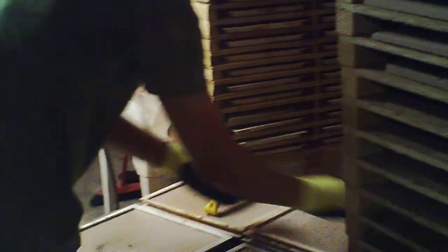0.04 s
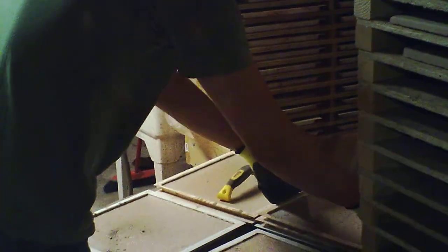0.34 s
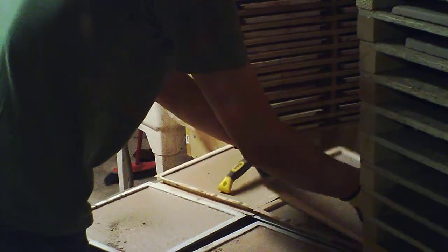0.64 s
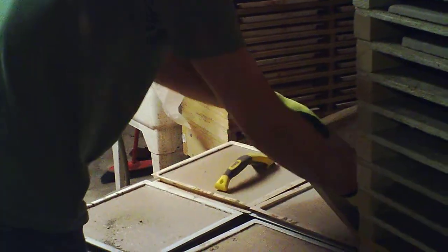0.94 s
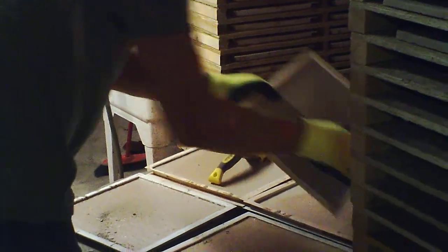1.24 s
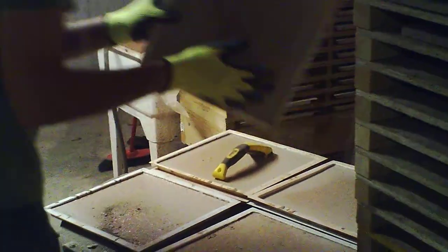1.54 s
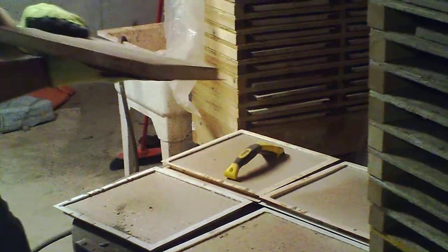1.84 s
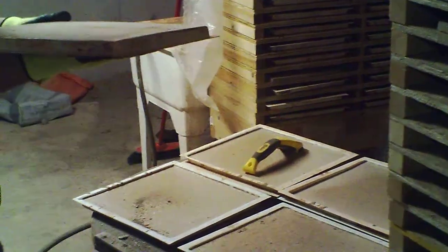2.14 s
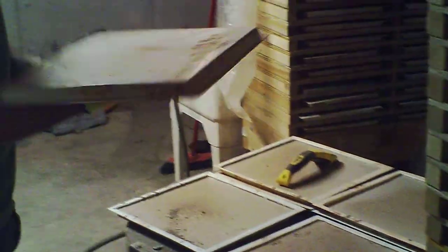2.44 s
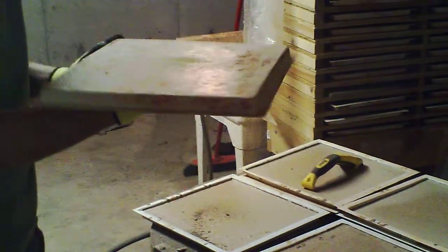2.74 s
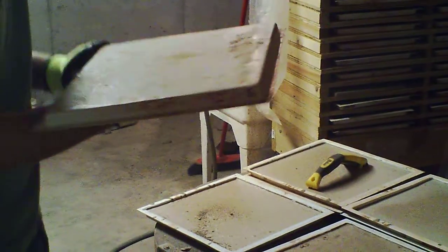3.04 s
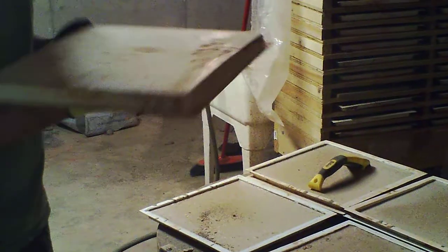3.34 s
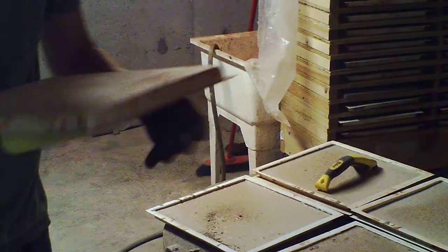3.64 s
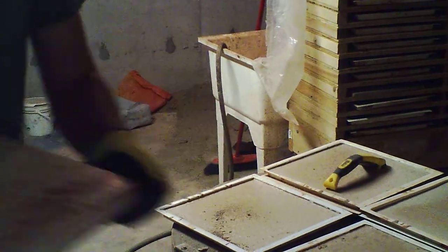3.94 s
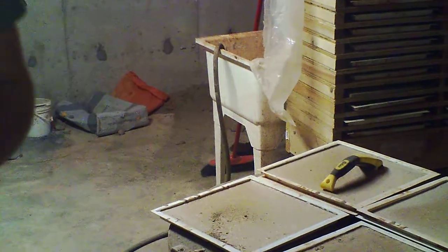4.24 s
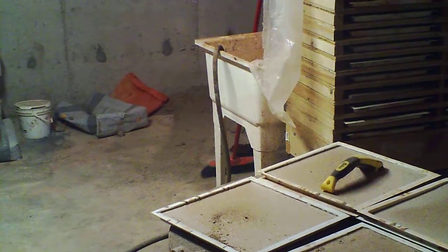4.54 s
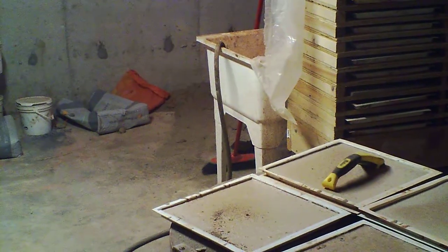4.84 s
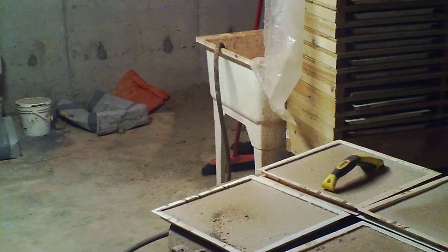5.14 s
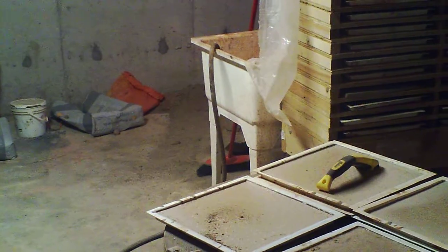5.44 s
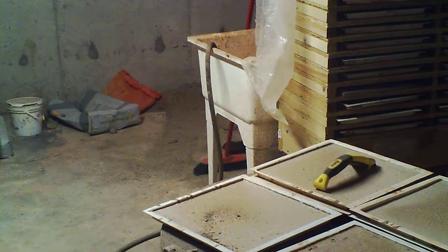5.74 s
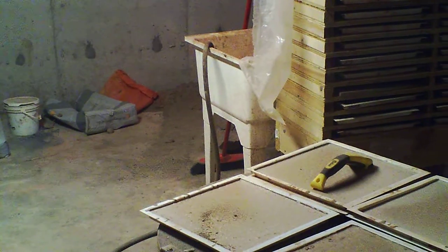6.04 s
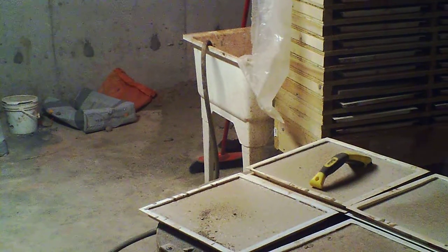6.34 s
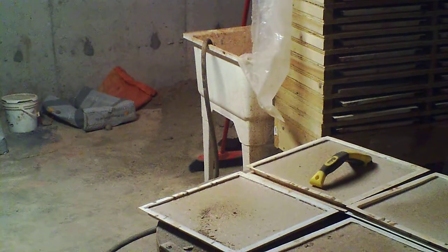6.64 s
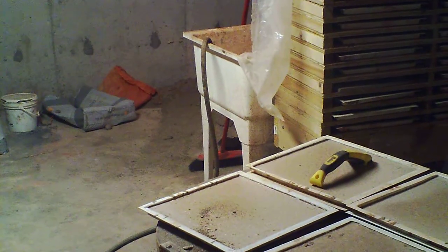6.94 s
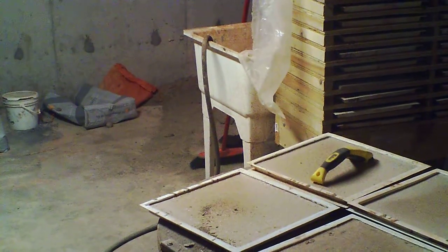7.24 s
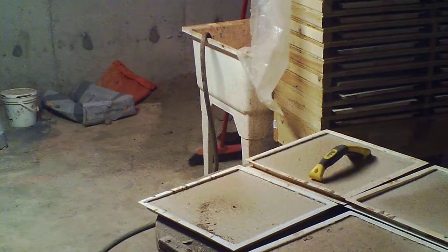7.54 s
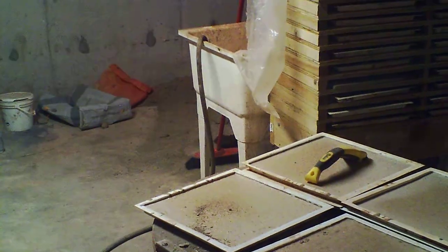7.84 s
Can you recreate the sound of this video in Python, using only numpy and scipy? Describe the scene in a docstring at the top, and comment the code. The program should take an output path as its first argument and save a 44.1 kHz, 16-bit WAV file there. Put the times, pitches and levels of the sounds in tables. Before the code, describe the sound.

In a concrete workshop with a short echo, a stone tile is handled near a single microphone. It rubs against molds and gloves in quiet, uneven strokes, with a dull bump and crisp snaps of grit. Near the end it lands loudly on a rack in two ringing double knocks, slides with a short scrape, and a wooden board clatters. Faint camera ticking and still air lie underneath.

```python
"""A cast stone tile, lifted from its mold by a gloved worker, turned over and set down hard on a rack.
It rings when struck, rubs on molds and gloves and is shoved along; a wooden shelf board clunks.
One microphone in a concrete workshop: grit snaps close by, and the walls add a short echo.
Underneath lie the still air of the room and the faint ticking and whine of the camera."""
import sys
import numpy as np
from scipy import signal
from scipy.fft import next_fast_len
from scipy.io import wavfile
from scipy.ndimage import uniform_filter1d, minimum_filter1d

SR = 44100
rng = np.random.default_rng(int(sys.argv[2]) if len(sys.argv) > 2 else 0)


def persist_wave(psi):
    """Save psi, clipped to +-1, as 16-bit WAV."""
    counts = np.round(np.clip(psi, -1, 1) * 32767).astype(np.int16)
    wavfile.write(sys.argv[1], SR, np.atleast_2d(counts).T)


N = 351918
TIME = np.arange(N) / SR

# spectrum of breaking grit: (frequency [Hz], relative level [dB])
GRIT_SPECTRUM = [(100, -28), (600, -4), (1600, -1.5), (3300, -1), (5000, 0), (8500, 2.5), (11200, -1),
                 (12600, -16), (16000, -14)]


def amp(db):
    """Decibels to gain."""
    return 10 ** (np.asarray(db) / 20)


def unit(x):
    """Scales to rms 1."""
    return x / np.sqrt(np.mean(x ** 2) + 1e-20)


def read(points, hz):
    """Reads a table on a log-frequency axis."""
    freqs, values = np.transpose(points)
    return np.interp(np.log(hz + 1), np.log(freqs + 1), values)


def level(curve):
    """Gain over time from rows (time [s], level [dB]); silent outside them."""
    times, db = np.transpose(curve)
    return amp(np.interp(TIME, times, db, left=-np.inf, right=-np.inf))


def add(mix, start_s, sound):
    """Lays a sound into the mix."""
    part = mix[max(round(start_s * SR), 0):][:len(sound)]
    part += sound[:len(part)]


def play(source, rows, **settings):
    """Sounds one event for each row (time [s], arguments of the source)."""
    mix = np.zeros(N)
    for start_s, *row in rows:
        add(mix, start_s, source(*row, **settings))
    return mix


def shape(x, db_at):
    """Filters by a gain in dB given as a function of frequency; causal, so attacks stay sharp."""
    size = next_fast_len(len(x) + 4096)
    log_gain = np.log(amp(db_at(abs(np.fft.fftfreq(size, 1 / SR)))))
    response = np.exp(np.conj(signal.hilbert(log_gain)))
    return np.fft.ifft(np.fft.fft(x, size) * response).real[:len(x)]


def colour(x, spectrum):
    """Filters a sound by a spectrum table and scales it to rms 1."""
    return unit(shape(x, lambda hz: read(spectrum, hz)))


def hump(hz, centre_hz, octaves):
    """A bell on the log-frequency axis."""
    return np.exp(-.5 * (np.log2((hz + 1) / centre_hz) / octaves) ** 2)


def fade(t, t60):
    """Exponential decay, 60 dB in t60 seconds."""
    return np.exp(-np.log(1000) * t / t60)


def die_away(x, t60s):
    """Lets each band decay at its own speed."""
    hz, t, bands = signal.stft(x, SR, nperseg=256)
    return signal.istft(bands * fade(t, read(t60s, hz)[:, None]), SR)[1][:len(x)]


def still_air():
    """Room tone: a low, even rush in the workshop."""
    # spectrum of the air: (frequency [Hz], relative level [dB])
    spectrum = [(12, -9), (30, -1.5), (70, -5), (130, -9.5), (320, -12.5), (550, -21.5), (1300, -24.5),
                (2400, -31), (4000, -31.5), (6400, -35.5), (8000, -32.5), (11500, -38), (16000, -41)]
    return amp(-53.5) * colour(rng.standard_normal(N), spectrum)


def camera_ticks(ticks_per_s=30.04, first_s=.021, tick_s=.013, jitter_s=.0013, spread_db=.6):
    """Right at the microphone, soft, slightly uneven ticks ring in the camera's case."""
    # resonances of the case: (frequency [Hz], width [Hz], gain [dB])
    case_modes = [(352, 34, 11.5), (670, 130, 6), (1090, 53, 7), (1660, 400, -1), (3080, 650, -12.5),
                  (4050, 550, -25), (5270, 230, -13.5), (6530, 330, -14), (7500, 460, -20.5)]
    # strength of the ticking: (time [s], level [dB])
    strength = [(0, -57.5), (1.3, -59.5), (2.4, -59.5), (3.6, -57.5), (4.7, -61), (6.2, -63.5), (8, -62)]
    tick = signal.windows.tukey(round(tick_s * SR), .5)
    gate = np.zeros(N)
    for k, (late, size) in enumerate(rng.standard_normal((int(N * ticks_per_s / SR), 2))):
        add(gate, first_s + k / ticks_per_s + jitter_s * late, amp(spread_db * size) * tick)
    bursts = gate * rng.choice([-1., 1.], N)
    ring = sum(amp(db) * signal.lfilter(*signal.iirpeak(hz, hz / width, SR), bursts)
               for hz, width, db in case_modes)
    return unit(ring + amp(-14) * bursts) * level(strength)


def hum_and_whine():
    """A steady low hum and the camera's thin whine."""
    # steady tones: (frequency [Hz], rms level [dB])
    tones = [(30, -61.5), (60, -62), (180, -69), (12195, -95), (12941, -73), (13730, -83)]
    return sum(amp(db) * np.sqrt(2) * np.sin(2 * np.pi * (hz * TIME + rng.random())) for hz, db in tones)


def room(x, build_s=0.004, echoes_per_s=4000):
    """Sparse echoes from concrete walls build up quickly and die within about half a second."""
    # decay of the workshop: (frequency [Hz], t60 [s])
    decay = [(150, 0.36), (700, 0.53), (2000, 0.41), (5000, 0.4), (10000, 0.25), (16000, 0.52)]
    t = np.arange(SR * 3 // 4) / SR
    echoes = rng.choice([-1., 1.], len(t)) * (rng.random(len(t)) < echoes_per_s / SR)
    tail = die_away(echoes, decay) * (1 - np.exp(-t / build_s))
    return signal.fftconvolve(x, tail / np.linalg.norm(tail))[:N]


def scuff(db, ring_hz, length_s, slips_per_s=3000):
    """A quick run of small slips excites one resonance, rising fast and easing off."""
    progress = np.linspace(0, 1, round(length_s * SR))
    slips = rng.standard_normal(len(progress)) * (rng.random(len(progress)) < slips_per_s / SR)
    slips *= np.sin(np.pi * np.sqrt(progress))
    chatter = shape(slips, lambda hz: read(GRIT_SPECTRUM, hz) + 20 * hump(hz, ring_hz, octaves=0.39))
    return amp(db) * unit(chatter)


def snap(db, ring_hz, lift_db, t60):
    """A grain breaks or an edge slips: a brief burst through one resonance, and a faint short tail."""
    t = np.arange(SR // 8) / SR
    burst = rng.choice([-1., 1.], len(t)) * (fade(t, t60) + amp(-21) * fade(t, t60=0.14))
    ring = shape(burst, lambda hz: read(GRIT_SPECTRUM, hz) + lift_db * hump(hz, ring_hz, octaves=0.25))
    return amp(db) * np.std(burst) * unit(ring)


def bump(db, hz):
    """A padded blow wakes only a low mode, over a dull thud."""
    # spectrum of the thud: (frequency [Hz], relative level [dB])
    spectrum = [(60, -6), (170, -8), (480, -0.5), (800, -4.5), (1500, -14.5), (3000, -25), (12000, -66)]
    t = np.arange(SR // 2) / SR
    thud = colour(rng.standard_normal(len(t)), spectrum) * fade(t, t60=0.17)
    ring = np.sin(2 * np.pi * hz * t) * fade(t, t60=0.14)
    return amp(db) * (ring + amp(-7) * thud)


def stroke_pressures(depth_db=22.5):
    """Pressure on stone and on gloves: each stroke builds by depth_db to its peak, then lets go."""
    # strokes of the tile: (peak time [s], swell [s], release [s], stone rub [dB], glove brush [dB])
    strokes = [(.04, 0.2, 0.18, -55.5, -88), (.285, 0.064, 0.046, -60, -48.5), (.385, 0.23, 0.1, -50, -51),
               (.495, 0.1, 0.079, -37, -37.5), (0.559, 0.029, 0.12, -39.5, -42.5),
               (.775, 0.13, 0.086, -65, -48.5), (.91, 0.29, 0.29, -49.5, -55.5),
               (1.117, 0.099, 0.083, -41.5, -48.5), (1.6, .05, 0.089, -60, -48),
               (1.73, 0.27, 0.29, -68, -52), (1.9, .04, 0.11, -71, -49.5), (2.24, 0.14, .09, -46.5, -50.5),
               (2.53, .06, 0.08, -51, -51), (2.72, 0.1, 0.16, -51.5, -47.5), (2.84, 0.038, 0.082, -47, -48),
               (3.15, 0.27, 0.2, -54, -57.5), (3.33, 0.07, 0.16, -68, -47.5),
               (3.4, 0.073, 0.081, -48.5, -67), (3.78, 0.045, 0.045, -51, -50),
               (4.02, 0.57, 0.61, -55.5, -50.5), (4.3, .1, 0.24, -50, -52), (4.566, 0.099, 0.072, -35, -43),
               (4.915, .03, 0.21, -45, -53), (5.02, 0.044, 0.88, -55, -52.5), (5.3, 0.23, 0.15, -46, -52),
               (5.55, 0.2, 0.27, -52, -57.5), (5.925, 0.16, 0.085, -41, -53.5),
               (6.03, 0.086, 0.1, -51.5, -52), (6.19, 0.12, 0.066, -52, -62),
               (6.329, 0.071, 0.081, -40.5, -51.5), (6.4, 0.06, 0.047, -42, -63),
               (6.61, 0.34, 0.077, -49, -58)]
    power = np.zeros((2, N))
    for peak_s, swell_s, release_s, stone_db, glove_db in strokes:
        away = np.maximum((peak_s - TIME) / swell_s, (TIME - peak_s) / release_s)
        near = away < 3
        power[0, near] += amp(stone_db - depth_db * away[near]) ** 2
        power[1, near] += amp(glove_db - depth_db * away[near]) ** 2
    return np.sqrt(power)


def friction(pressure, spectrum, grains_per_s, spread_db=0, judder_db=0):
    """Sand grains catch and let go as tiny clicks, spread in size and bunched by the stroke's judder."""
    sizes = amp(spread_db * np.minimum(rng.exponential(1, N), 4))
    clicks = sizes * rng.choice([-1, 1], N) * (rng.random(N) < grains_per_s / SR)
    judder = unit(uniform_filter1d(uniform_filter1d(rng.standard_normal(N), size=500), size=300))
    return colour(clicks * amp(judder_db * judder), spectrum) * pressure


def tile_sliding(on_stone, on_gloves):
    """The tile rubs over the molds, brushes through the gloves and is shoved along its shelf."""
    # spectra of the three contacts: (frequency [Hz], relative level [dB])
    stone_spectrum = [(100, -19.5), (300, -10), (480, -5.5), (700, -2), (850, -1.5), (1100, 0),
                      (1750, -3.5), (2400, -15), (3400, -8), (5000, -15), (10000, -38), (16000, -50.5)]
    glove_spectrum = [(300, -22.5), (1500, 0.5), (3200, -0.5), (4600, -5.5), (6000, -3.5), (7700, -3),
                      (9500, -1.5), (11300, -7), (12600, -11.5), (16000, -24.5)]
    shelf_spectrum = [(200, -42), (480, -28), (720, -2), (900, -22), (1080, -2.5), (1500, -5.5), (2500, -4),
                      (3600, 4), (4300, -3.5), (5400, -1), (9400, -6.5), (12000, -17.5), (16000, -22)]
    # push along the shelf: (time [s], level [dB])
    push = [(6.98, -57), (7.03, -51.5), (7.085, -49), (7.115, -35), (7.17, -29.5), (7.2, -31.5),
            (7.225, -42.5), (7.28, -65), (7.4, -84)]
    rub = friction(on_stone, stone_spectrum, grains_per_s=3500, judder_db=3.5)
    brush = friction(on_gloves, glove_spectrum, grains_per_s=3900, spread_db=1.5, judder_db=2.5)
    shove = friction(level(push), shelf_spectrum, grains_per_s=2400, spread_db=1.8, judder_db=1.8)
    return amp(-1.6) * rub + amp(-1.8) * brush + shove


def knock(db, treble_db, place_hz, lift_db, crack_db, modes, modes_db, body_db, lowest_hz):
    """A hard contact cracks, then the struck thing rings; the place of the blow favours some modes."""
    # spectra of the crack and the dense ringing between modes: (frequency [Hz], relative level [dB])
    crack_spectrum = [(100, -7), (270, -1.5), (550, -6), (1100, -1), (1850, 8.5), (2350, -12.5),
                      (3200, 9.5), (4500, 0), (6500, -0.5), (10000, -3), (12500, -22.5), (16000, -36)]
    body_spectrum = [(40, -31), (130, -10), (250, -12.5), (420, -4.5), (700, 0.5), (1200, 1), (1850, 2),
                     (2350, -1.5), (3300, -2.5), (4500, -7), (8000, -13), (10500, -17), (13000, -18),
                     (16000, -23.5)]
    # decay of that dense ringing: (frequency [Hz], t60 [s])
    body_decay = [(150, 0.82), (600, 0.26), (1500, 0.28), (3500, 0.22), (8000, 0.26), (15000, 0.08)]
    t = np.arange(SR // 2) / SR
    partials = sum((-1) ** k * amp(mode_db) * fade(t, t60) * np.sin(2 * np.pi * hz * t)
                   for k, (hz, mode_db, t60) in enumerate(modes))
    partials /= np.sqrt(sum(amp(mode_db) ** 2 for _, mode_db, _ in modes) / 2)
    body = die_away(colour(rng.standard_normal(len(t)), body_spectrum), body_decay)
    ring = amp(modes_db) * partials + amp(body_db) * body
    ring = shape(ring, lambda hz: treble_db * hz ** 2 / (hz ** 2 + 2800 ** 2)
                 + lift_db * (hump(hz, place_hz, octaves=0.26) - .5))
    crack = colour(rng.choice([-1., 1.], len(t)), crack_spectrum) * fade(t, t60=0.04)
    # a small slab radiates almost no deep bass
    low_cut = signal.butter(2, lowest_hz, "high", fs=SR, output="sos")
    return amp(db) * signal.sosfilt(low_cut, ring + amp(crack_db) * crack)


def board_clunks(gap_s=0.018, shrink=.95, loss_db=3.5, dull_db=3):
    """A wooden shelf board catches and drops, bouncing at shrinking gaps, weaker and duller each time."""
    # blows on the board:
    # (time [s], relative level [dB], treble [dB], favoured pitch [Hz], its lift [dB], crack [dB])
    blows = [(7.587, -31, -7, 900, 1.5, 3), (7.705, -27, -10.5, 198, 7, -4),
             (7.7545, -28.5, -5, 1000, 1.7, -14), (7.765, -18.5, -7, 1160, 5.5, -1)]
    # modes of the board: (frequency [Hz], relative level [dB], t60 [s])
    modes = [(178, -15.5, 0.23), (351, -4, 0.25), (463, -6.5, 0.48), (541, -1.5, 0.65), (800, -8, .22),
             (910, -10, 0.067), (960, -8, 0.15), (995, -2, 0.16), (1090, 5.5, 0.057), (1206, -20, 0.2),
             (1350, -6, 0.12), (1440, -22, 0.15), (1750, -1.5, 0.051), (2030, -11, 0.17), (3110, 2, 0.11)]
    delays = np.cumsum(gap_s * shrink ** np.arange(5)) - gap_s
    bounces = [(start_s + delay, db - k * loss_db, treble - k * dull_db, hz, lift, crack - k * dull_db)
               for start_s, db, treble, hz, lift, crack in blows for k, delay in enumerate(delays)]
    return amp(1.1) * play(knock, bounces, modes=modes, modes_db=-4.5, body_db=0.5, lowest_hz=80)


def tile_knocks():
    """The stone rings as it strikes molds and rack, lightly at first, then set down hard."""
    # blows on the tile:
    # (time [s], relative level [dB], treble [dB], favoured pitch [Hz], its lift [dB], crack [dB])
    blows = [(.4585, -43, 1, 1260, 11, 0), (.539, -36.5, 13, 660, 5.5, -16), (1.056, -48.5, 5, 1300, 1, -4),
             (2.23, -50.5, -4, 1700, 11, -11), (3.301, -46, -21, 1500, 21, -14),
             (4.841, -42.5, -4, 1060, 10, -11), (4.896, -41.5, -6, 980, 1.5, -17),
             (5.538, -51, -4, 990, 6, 7.5), (5.846, -43.5, 6, 910, 17, -.5),
             (6.539, -36.5, -25, 1100, 5, -5), (6.6342, -15, -13, 1050, 13.5, 8.5),
             (6.6437, -15, 4.5, 1830, 1, 8.5), (6.776, -32, -13, 1100, 0.5, -4),
             (6.8121, -15.5, 2, 750, 7.5, -2), (6.8403, -23, -1.5, 1140, 4.5, 3.5),
             (7.071, -41, -8, 1160, 10, -14)]
    # modes of the tile: (frequency [Hz], relative level [dB], t60 [s])
    modes = [(205, -18, 1), (440, -6, 0.16), (524, -7, 0.32), (626, -7.5, 0.42), (677, -1, 0.46),
             (718, 2.5, 0.26), (962, 1.5, 0.053), (902, -3, 0.3), (1055, -0.5, 0.38), (1066, 6, 0.16),
             (1161, -7.5, 0.58), (1227, 2.5, 0.18), (1330, -6, 0.4), (1490, -21.5, .2), (1500, 5.5, 0.2),
             (1750, -7, 0.18), (1814, 11.5, 0.12), (1790, -13, 0.16), (1986, 4, 0.086), (2990, 1.5, 0.13),
             (3150, -15.5, 0.086), (3740, -7.5, 0.057), (5170, 0, 0.24)]
    return amp(-0.5) * play(knock, blows, modes=modes, modes_db=-0.5, body_db=-0.5, lowest_hz=168)


def scene():
    """At the microphone: blows, snaps and friction, each with its own share of the room."""
    # grit and mold edges snapping close by:
    # (time [s], relative level [dB], ring [Hz], its lift [dB], t60 [s])
    grit_snaps = [(0.422, -32, 9000, 6, .0074), (.5388, -17.5, 5140, 11, 0.02),
                  (0.774, -40, 7500, 26, 0.021), (1.458, -40, 2820, 20, 0.0042),
                  (1.586, -34, 6350, 4, 0.0063), (2.199, -32.5, 11000, 15, .012),
                  (2.232, -28, 2800, 18, 0.0037), (2.703, -35, 5000, -1, 0.014),
                  (2.731, -33.5, 9700, 5, 0.013), (3.286, -32, 6650, 8, 0.021),
                  (3.301, -31.5, 8250, 3.5, 0.056), (3.485, -39.5, 1580, 18, 0.021),
                  (4.0598, -29.5, 3650, 1, 0.029), (4.1266, -25, 10100, 6, 0.0043),
                  (4.1418, -16, 7900, 15, 0.0082), (4.142, -13.5, 2160, 12, 0.01),
                  (4.148, -29.5, 2000, 10, .13), (4.2194, -23.5, 8550, 14, 0.0063),
                  (4.2295, -15, 8300, 3, 0.0038), (5.6084, -37.5, 3780, 20, .008),
                  (6.1685, -41, 10400, 8, .008), (7.206, -24, 3500, 9, 0.011),
                  (7.5867, -26.5, 3260, 18, 0.031), (7.7032, -18, 6640, 5, 0.0067)]
    # stone and soles scuffing on grit: (time [s], relative level [dB], pitch [Hz], length [s])
    grit_scuffs = [(.456, -38, 10750, 0.044), (.458, -39.5, 1270, 0.1), (2.222, -43, 1690, .034),
                   (4.535, -39.5, 960, 0.033), (5.915, -50, 850, .047), (6.312, -44.5, 780, 0.021),
                   (6.388, -51, 790, 0.025), (6.609, -40.5, 1260, 0.18)]
    # hollow bumps of the tile in the hands: (time [s], level [dB], pitch [Hz])
    hand_bumps = [(1.456, -50, 296), (1.751, -29.5, 422), (1.787, -33, 422), (5.09, -46, 408)]
    knocks = tile_knocks()
    clunks = board_clunks()
    snaps = amp(-2) * play(snap, grit_snaps)
    scuffs = amp(-5) * play(scuff, grit_scuffs)
    bumps = play(bump, hand_bumps)
    on_stone, on_gloves = stroke_pressures()
    rubbing = tile_sliding(on_stone, on_gloves) + scuffs
    # a few coarse grains crack close to the microphone, with no echo
    grit = amp(-8) * friction(on_gloves, GRIT_SPECTRUM, grains_per_s=150, spread_db=2.5)
    echo = room(amp(-19) * knocks + amp(-5) * clunks + amp(-10.5) * snaps
                + amp(-9.5) * bumps + amp(-10) * rubbing)
    background = still_air() + camera_ticks() + hum_and_whine()
    return (knocks + clunks + snaps + bumps + rubbing + grit + echo + background)[None]


def record(dry, ceiling=0.85, edge_hz=16000):
    """The camera's fast limiter holds down the loudest peaks; a low-pass cuts the highest treble."""
    gain = np.minimum(1, ceiling / (abs(dry) + 1e-9))
    limited = dry * uniform_filter1d(minimum_filter1d(gain, size=89), size=89)
    low_pass = signal.firwin(255, edge_hz, window=("kaiser", 9), fs=SR)
    return signal.oaconvolve(limited, low_pass[None], "same")


dry = scene()
out = record(dry)
persist_wave(out)
```